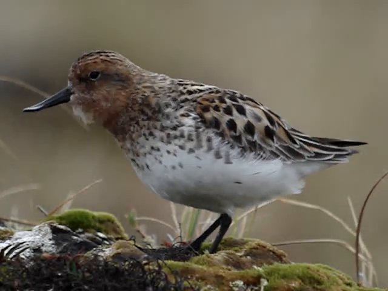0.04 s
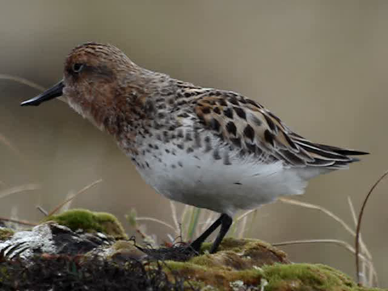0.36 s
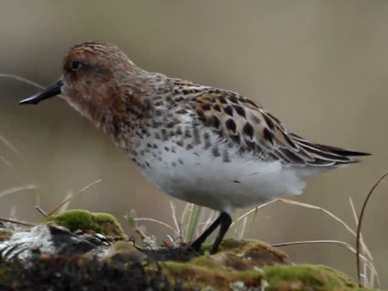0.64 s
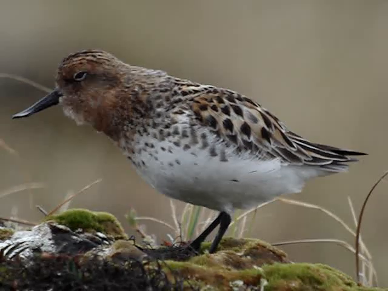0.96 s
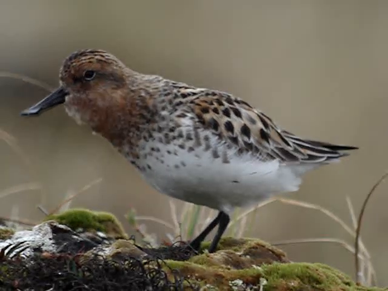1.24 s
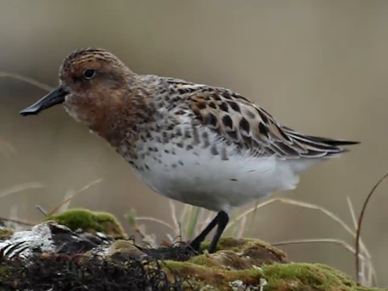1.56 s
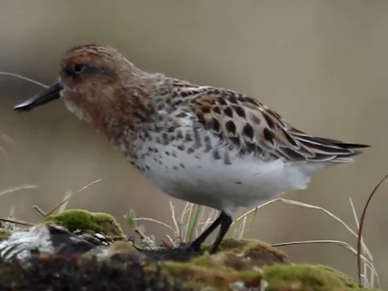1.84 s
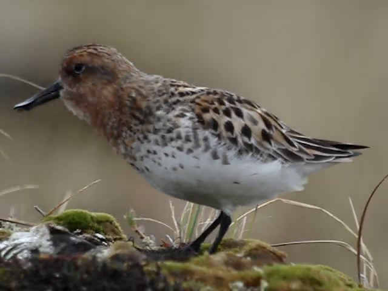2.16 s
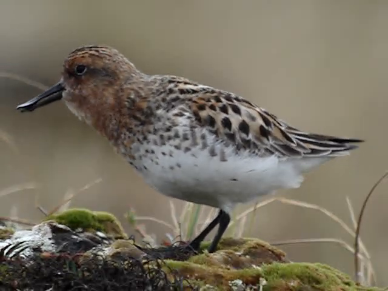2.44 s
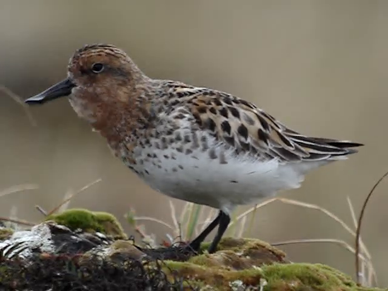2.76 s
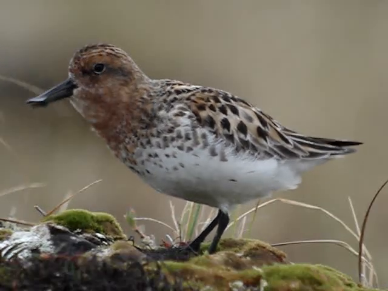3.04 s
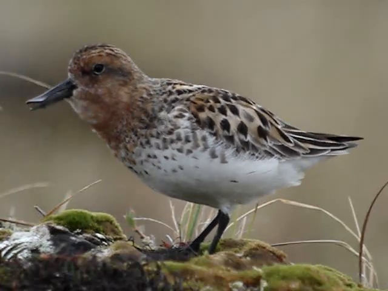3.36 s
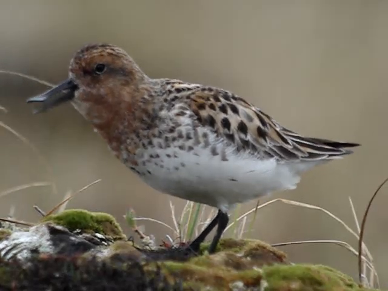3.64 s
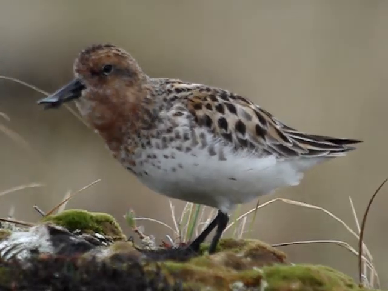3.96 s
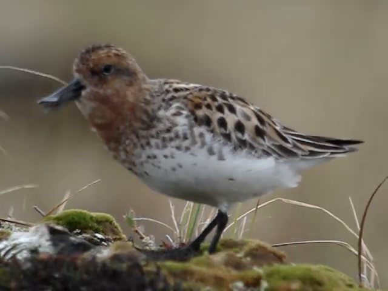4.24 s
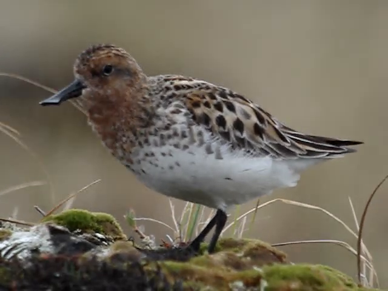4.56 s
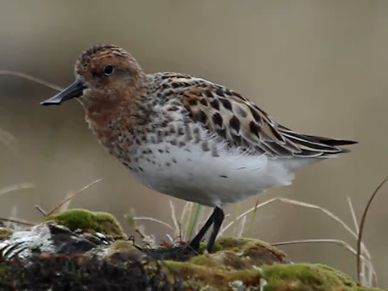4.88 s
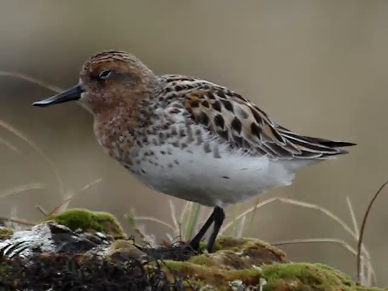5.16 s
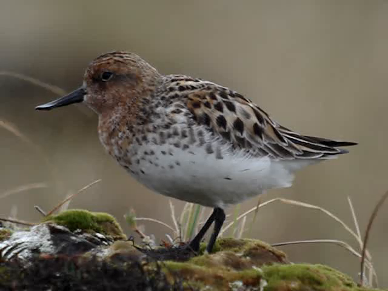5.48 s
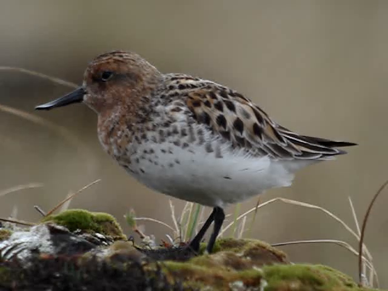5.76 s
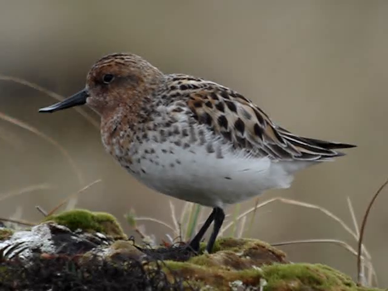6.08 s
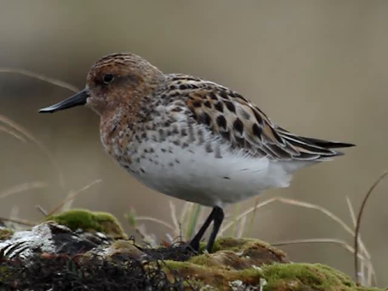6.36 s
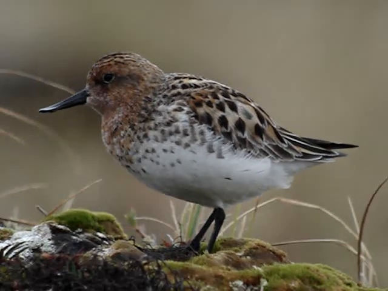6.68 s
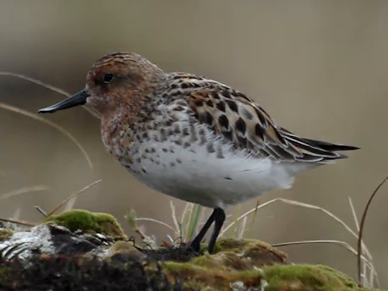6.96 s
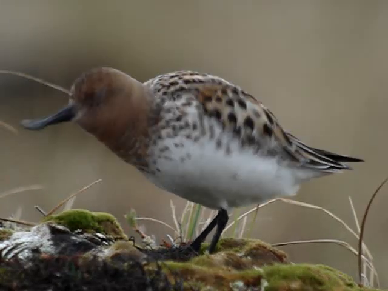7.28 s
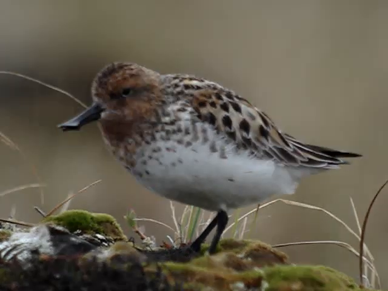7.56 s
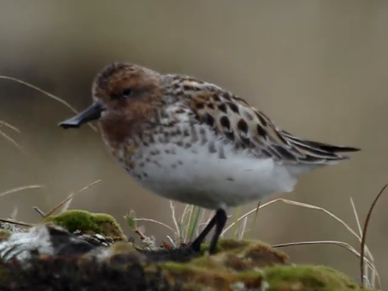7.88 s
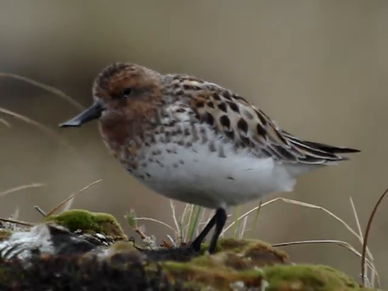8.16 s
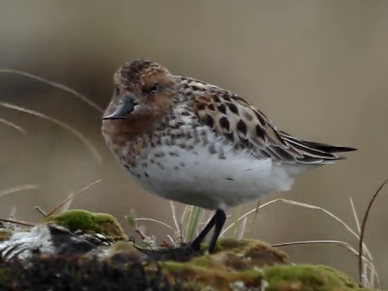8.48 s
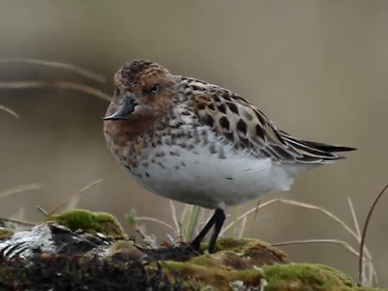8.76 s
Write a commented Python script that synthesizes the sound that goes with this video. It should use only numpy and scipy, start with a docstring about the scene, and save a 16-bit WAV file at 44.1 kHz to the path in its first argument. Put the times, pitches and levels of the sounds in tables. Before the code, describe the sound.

A small shorebird gives four buzzy, high trills while wind buffets the microphone over a steady hiss.

```python
"""A sandpiper on open tundra ticks softly, then gives four buzzy trills, each led in by a short creak.
Its syrinx releases a train of tiny whistled pulses, modulated in amplitude and frequency about
33 times a second in the trills. Other birds warble faintly far off. Wind eddies buffet the
microphone with low pressure fluctuations, over a steady hiss and a thin electronic whine."""
import sys
import numpy as np
from scipy import signal
from scipy.fft import rfft, irfft, next_fast_len
from scipy.io import wavfile
from scipy.ndimage import uniform_filter1d, map_coordinates

SR = 44100
rng = np.random.default_rng(int(sys.argv[2]) if len(sys.argv) > 2 else 0)


def int16_out(signal):
    """Quantize to a 16-bit WAV file."""
    q = np.round(np.clip(np.atleast_2d(signal).T, -1, 1) * 32767)
    wavfile.write(sys.argv[1], SR, q.astype(np.int16))


N = 388962


def amp(db):
    """Amplitude ratio of a level in decibels."""
    return 10 ** (np.asarray(db) / 20)


def unit(x):
    """Normalisation to rms 1."""
    return x / np.sqrt(np.mean(x ** 2) + 1e-20)


def wobble(rate, size):
    """Smooth random modulation: a spline through `rate` Gaussian knots a second."""
    knots = rng.standard_normal(int(size * rate / SR) + 4)
    return map_coordinates(knots, [np.arange(size) * rate / SR])


def filtered(x, response):
    """Linear filtering: the spectrum of x is multiplied by a frequency response."""
    m = next_fast_len(len(x) + 8192)
    return irfft(rfft(x, m) * response(np.fft.rfftfreq(m, 1 / SR)), m)[:len(x)]


def noise(spectrum):
    """Spectral shaping of white noise by (frequency [Hz], level [dB]) points, at rms 1."""
    f, db = np.transpose(spectrum)
    white = rng.standard_normal(N)
    return unit(filtered(white, lambda hz: amp(np.interp(np.log(hz + 1), np.log(f), db))))


def add(track, start, x):
    """Superposition of x on the track from `start` seconds."""
    part = track[max(round(start * SR), 0):][:len(x)]
    part += x[:len(part)]


def cycles(rate):
    """Phase in cycles, the time integral of frequency."""
    return np.cumsum(rate) / SR


# Spectrum of the hiss: (frequency [Hz], relative density [dB])
HISS_SPECTRUM = [(20, 4.5), (100, -10), (300, -1), (600, -2), (1200, -4.5), (2500, -8), (4000, -9),
                 (7450, -11), (7800, -4), (8100, -10), (8400, -9.5), (10000, -13.5)]
# Electronic tones: (frequency [Hz], level [dB])
WHINE_TONES = [(7867, -65), (8001, -69), (8032, -71), (7747, -81), (7217, -82), (4888, -83), (3832, -83)]


def hiss_and_whine(hiss_db=-54, waver_rad=0.54):
    """Noise floor: broadband hiss of air and electronics, plus weakly phase-modulated tones."""
    t = np.arange(N) / SR
    whine = sum(amp(db) * unit(np.sin(2 * np.pi * hz * t + waver_rad * wobble(25, N)))
                for hz, db in WHINE_TONES)
    return amp(hiss_db) * noise(HISS_SPECTRUM) + whine


# Envelope of the breeze: (time [s], level [dB])
BREEZE_LEVELS = [(0, -60), (.5, -63.5), (.95, -56.5), (2.3, -65.5), (2.8, -56), (3.2, -56), (3.7, -45),
                 (4.1, -58), (4.4, -53.5), (4.7, -41), (5.15, -44), (5.6, -42), (5.8, -48), (6.6, -49.5),
                 (7.1, -53), (7.9, -47), (8.4, -54), (8.82, -44.5)]
# Strong eddies striking the microphone: (time [s], level [dB], width [s])
WIND_PUFFS = [(.298, -46, .017), (.993, -41, 0.044), (2.488, -38, .025), (3.062, -36.5, 0.021),
              (3.371, -31, 0.02145), (3.395, -35.5, 0.0283), (3.584, -31, 0.023), (3.65, -34.5, 0.02692),
              (3.695, -32, .03), (3.724, -33, .016), (3.776, -32, .01), (3.805, -29, 0.021),
              (3.935, -43, .04), (4.252, -37, 0.02), (4.336, -39.5, .02), (4.476, -20.5, 0.022),
              (4.508, -25.5, .017), (4.544, -22, 0.041), (4.658, -32, 0.011), (4.68, -24.5, 0.01163),
              (4.729, -23, 0.02474), (4.75, -23, 0.0243), (4.844, -26, 0.024), (4.935, -26, 0.018),
              (4.966, -32, 0.017), (5.046, -29.5, 0.015), (5.072, -30.5, 0.024), (5.183, -34, 0.02),
              (5.248, -30, .029), (5.299, -22, 0.01874), (5.376, -30.5, 0.016), (5.477, -24.5, 0.0223),
              (5.53, -23.5, 0.01575), (5.552, -26.5, .015), (5.712, -28.5, 0.023), (5.802, -26, 0.01163),
              (5.847, -22, 0.0267), (5.91, -20, 0.023), (5.983, -34, .016), (6.193, -38, 0.017),
              (7.142, -35.5, 0.014), (7.371, -32.5, 0.0235), (7.427, -35, 0.0239), (7.755, -38, 0.016),
              (7.85, -28.5, 0.0276), (7.882, -27, 0.0258), (7.956, -37.5, 0.0243), (8.031, -36.5, 0.017),
              (8.237, -39.5, 0.022), (8.416, -41, 0.049), (8.662, -20.5, 0.0113), (8.679, -19, 0.0121)]
# Turbulence spectrum at sweep speed 1: (frequency [Hz], relative density [dB])
EDDY_SPECTRUM = [(15, -26.5), (60, -8.5), (120, 1.5), (220, 0.5), (350, -5.5), (500, -10.5), (700, -20),
                 (1000, -30), (1400, -43.5), (2200, -69)]


def wind(flutter_db=5.0, breeze_hz=125, eddy_hz=225, low_cut_hz=45, screen_hz=1220):
    """Turbulent pressure at the microphone: the stronger and smaller an eddy, the higher its rumble."""
    t = np.arange(N) / SR
    power = amp(np.interp(t, *np.transpose(BREEZE_LEVELS)) + flutter_db * wobble(24, N)) ** 2
    weighted_hz = power * breeze_hz  # weighted by power, so the strongest puff sets the speed
    for time, db, width in WIND_PUFFS:
        near = slice(max(int((time - 2 * width) * SR), 0), int((time + 2 * width) * SR))
        puff_power = (amp(db) * np.exp(-((t[near] - time) / (.62 * width)) ** 2)) ** 2
        rumble_hz = 207.87 * 2 ** ((db + 30) / 30) * (.02 / width) ** .36  # an octave per 30 dB
        power[near] += puff_power
        weighted_hz[near] += puff_power * rumble_hz
    lumps = wobble(200, N)  # small fast eddies hit harder and sharper
    sweep_speed = weighted_hz / power / eddy_hz * np.exp(.16 * (lumps - .5))
    swirl = map_coordinates(noise(EDDY_SPECTRUM), [np.cumsum(sweep_speed)], order=3, mode="wrap")
    swirl *= amp(3.5 * lumps)
    mean_square = uniform_filter1d(uniform_filter1d(swirl ** 2, size=600), size=400)
    pressure = np.sqrt(power) * swirl / np.sqrt(np.abs(mean_square) + 1e-6)
    # the microphone drops the deepest bass, its windscreen the treble
    return filtered(pressure,
                    lambda hz: hz / np.hypot(hz, low_cut_hz) / np.hypot(1, (hz / screen_hz) ** 8))


def syrinx(pitch_hz, rate, width, fall_hz, arch_hz, scatter_db, rasp_rad, squareness, slip):
    """Pulsed phonation: each opening of the syrinx emits a brief whistle that drops as it closes."""
    count = cycles(rate)
    pulse = count.astype(int)
    u = 2 * (count - pulse) - 1  # -1 to 1 across each pulse
    strength, offset, detune, late = rng.standard_normal((256, 4))[pulse].T
    opening = np.exp(-np.abs((u - 0.071 * late) / width) ** squareness) * np.sqrt(np.abs(1 - u ** 2))
    # mean pitch since the middle of the pulse, for a whistle that arches and falls
    mean_hz = pitch_hz * (1 + 0.024 * detune) - fall_hz * u / 2 - arch_hz * (u ** 2 / 3 - width ** 2 / 4)
    # little phase slip makes the pulses alike and the buzz voiced; much slip makes it hoarse
    phase = 2 * np.pi * (mean_hz * u / (2 * rate) + slip * offset) + rasp_rad * wobble(1500, len(u))
    return unit(opening * amp(scatter_db * strength) * np.sin(phase))


def creak(length_s, pitch_hz, rate):
    """Time-bandwidth trade-off: very short pulses spread the whistle into a broad, hoarse note."""
    rates = np.full(int(length_s * SR), rate)
    voice = syrinx(pitch_hz, rates, width=0.43, fall_hz=650, arch_hz=400,
                   scatter_db=2.5, rasp_rad=0.51, squareness=1.06, slip=0.21)
    return voice * signal.windows.tukey(len(voice), .08)


# Soft ticks of the sandpiper: (time [s], pitch [Hz], level [dB])
BIRD_TICKS = [(.104, 2030, -53), (.139, 2050, -56.5), (.383, 2580, -51.5)]


def ticks():
    """Transients: a creak about one pulse long is heard as a tick."""
    out = np.zeros(N)
    for time, pitch_hz, db in BIRD_TICKS:
        add(out, time, amp(db) * creak(length_s=0.0058, pitch_hz=pitch_hz, rate=190))
    return out


def throat(x, cutoff_hz=3350):
    """Source-filter principle: the bird's throat is a low-pass that passes little above the whistle."""
    return filtered(x, lambda hz: 1 / np.hypot(1, (hz / cutoff_hz) ** 10))


def ground_scatter(x, t60_s=0.027):
    """Diffuse scattering: stones and tussocks return a very short, exponentially decaying tail."""
    t = np.arange(SR // 10) / SR
    tail = rng.standard_normal(len(t)) * amp(-60 * t / t60_s) * (t > .002)
    return signal.fftconvolve(x, tail / np.linalg.norm(tail))[:N]


# Distant whistles: (time [s], length [s], first pitch [Hz], last pitch [Hz], warble [Hz], level [dB])
DISTANT_CALLS = [(0.418, 0.28, 1470, 1300, 90, -63.5), (1.137, 0.45, 1138, 1150, 139, -63),
                 (1.363, 0.22, 2230, 2025, 150, -58.5), (6.399, .6, 1738, 1630, 130, -66)]


def far_birds(warble_rate=53, blur_rad=1.4, fading_db=3):
    """Atmospheric scintillation: the air varies the phase and level of frequency-modulated whistles."""
    out = np.zeros(N)
    for start, length, first_hz, last_hz, depth_hz, db in DISTANT_CALLS:
        t = np.arange(int(length * SR)) / SR
        hz = np.linspace(first_hz, last_hz, len(t)) + depth_hz * np.sin(2 * np.pi * warble_rate * t)
        tone = np.sin(2 * np.pi * cycles(hz) + blur_rad * wobble(300, len(t)))
        tone *= amp(fading_db * wobble(34, len(t)))
        add(out, start, amp(db) * unit(tone * signal.windows.tukey(len(t), .6)))
    return out


def trill(start, end, first_hz, top_hz, first_db, last_db, bend, swell_rate, crest_s,
          climb_s=0.13, attack_s=.004, release_s=0.014):
    """Coupled modulation: in a rising crescendo, pulses grow louder, longer and higher on each swell."""
    t = np.arange(start, end, 1 / SR)
    progress = np.linspace(0, 1, len(t))
    climb_hz = (top_hz - first_hz) * np.exp(-((t - start) / climb_s) ** 1.2)
    sag_hz = 100 * progress ** 4.7
    closing_hz = 261 * np.exp((t - end) / .008)  # the pitch drops as the note shuts off
    pitch_hz = top_hz - climb_hz - sag_hz - closing_hz
    gain = amp(first_db) + (amp(last_db) - amp(first_db)) * progress ** bend
    effort_db = 20 * np.log10(gain) + 39.5  # relative to a level of -39.5 dB
    pulse_rate = 131 * 2 ** (-effort_db / 27)  # louder singing has slower pulses
    swell_depth = np.clip(1.01 + effort_db / 22, .3, 1.1)  # and deeper swells
    swell = swell_depth * np.cos(2 * np.pi * swell_rate * (t - crest_s))
    pressure = 1 - 0.49 * np.abs((1 - swell) / 2) ** 1.6  # round crests, narrow dips
    # weak pulses close early and slide further down
    width = np.clip(0.69 + .06 * swell + 0.02 * effort_db, .2, 1)
    voice = syrinx(pitch_hz + 110 * swell, pulse_rate, width, fall_hz=310 - 110 * swell, arch_hz=426,
                   scatter_db=1.5, rasp_rad=0.14, squareness=3.5, slip=0.31)
    edges = np.clip(np.minimum((t - start) / attack_s, (end - t) / release_s), 0, 1)
    return gain * edges * unit(voice * pressure)


# Creak before each trill: (pitch [Hz], level [dB], level change at its end [dB])
LEAD_IN_CREAKS = [(1500, -60, 2), (2290, -48, -7), (2320, -43, -11), (2300, -44, -5.5)]
# Trills: (start [s], end [s], first pitch [Hz], top pitch [Hz], first level [dB], last level [dB],
# crescendo exponent [1])
TRILL_NOTES = [(1.86, 2.494, 1780, 2540, -56, -40.5, 1.2), (2.698, 3.192, 2350, 2690, -44, -35.5, 3.06),
               (3.383, 3.826, 2380, 2760, -41, -35, 3.12), (4.022, 4.421, 2405, 2794, -38.5, -33, 2)]
# Tremolo of each trill: (swell rate [Hz], time of the last crest [s])
TRILL_SWELLS = [(32.65, 2.459), (33.4, 3.174), (33.4, 3.821), (32.3, 4.403)]


def song(lead_s=.096, hold_s=0.066, shift_s=0.014):
    """Two regimes of one syrinx: a creak of short pulses leads into each trill of longer ones."""
    out = np.zeros(N)
    for (pitch_hz, db, change_db), note, swells in zip(LEAD_IN_CREAKS, TRILL_NOTES, TRILL_SWELLS):
        start = note[0]
        voice = creak(lead_s, pitch_hz, rate=152)
        shift = np.clip((np.arange(len(voice)) / SR - hold_s) / shift_s, 0, 1)
        add(out, start - lead_s, amp(db + change_db * shift) * voice)
        add(out, start, trill(*note, *swells))
    return out


def scene(ground_db=-17):
    """Superposition: all sources sum at one microphone over open ground."""
    sandpiper = throat(ticks() + song())
    scattered = amp(ground_db) * ground_scatter(sandpiper)
    return (sandpiper + scattered + far_birds() + wind() + hiss_and_whine())[None]


def record(dry, limit_hz=10050):
    """Band limiting: an ideal low-pass removes everything above the limit."""
    return np.array([filtered(channel, lambda hz: hz < limit_hz) for channel in dry])


dry = scene()
out = record(dry)
int16_out(out)
```